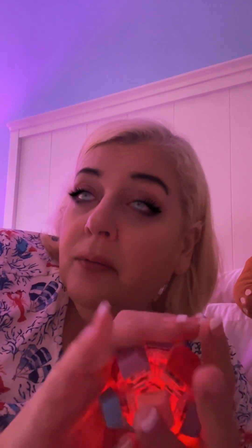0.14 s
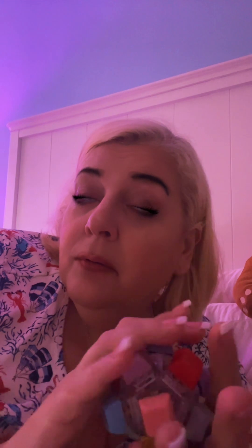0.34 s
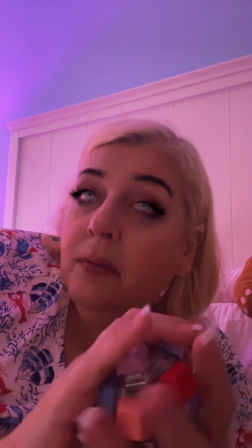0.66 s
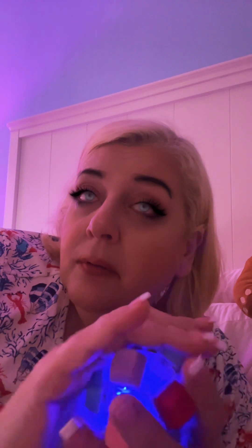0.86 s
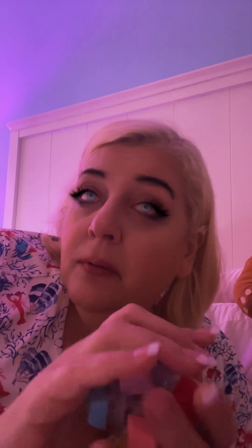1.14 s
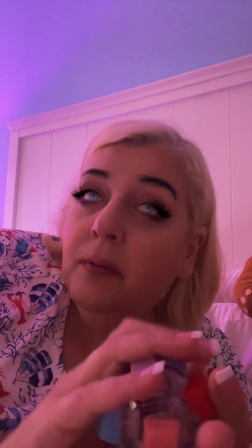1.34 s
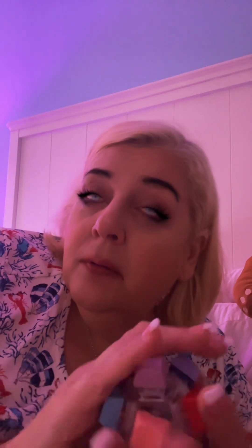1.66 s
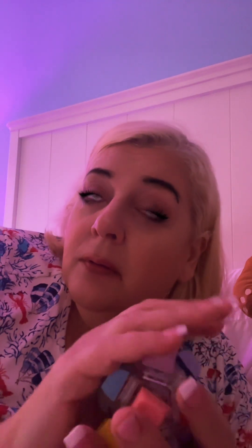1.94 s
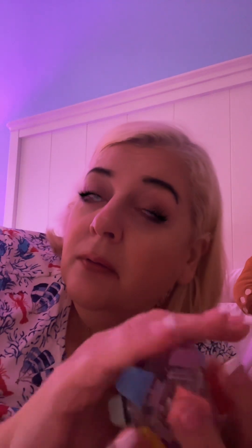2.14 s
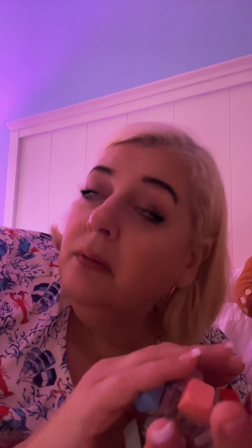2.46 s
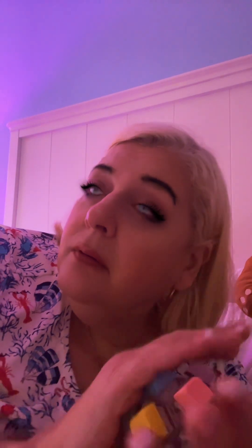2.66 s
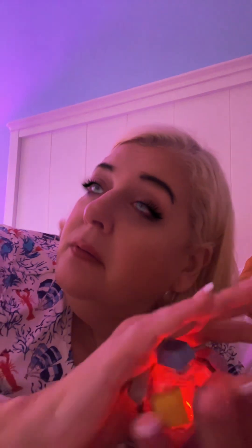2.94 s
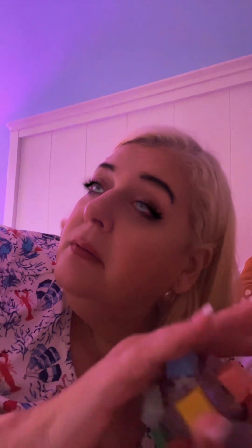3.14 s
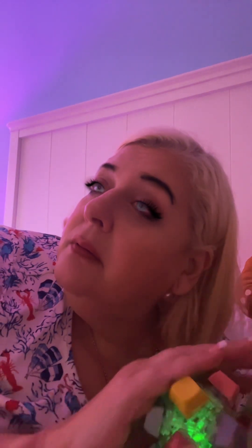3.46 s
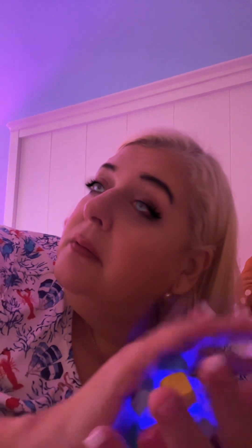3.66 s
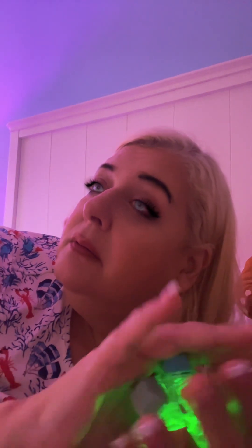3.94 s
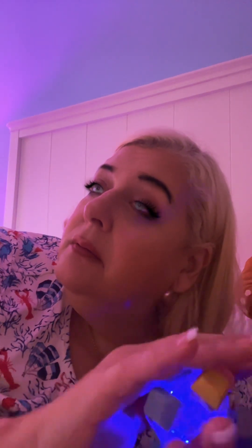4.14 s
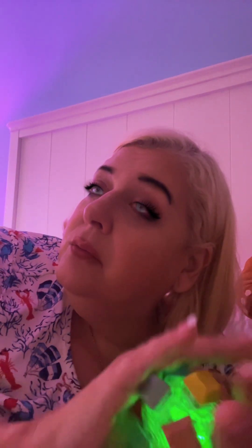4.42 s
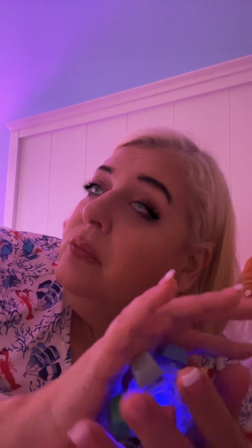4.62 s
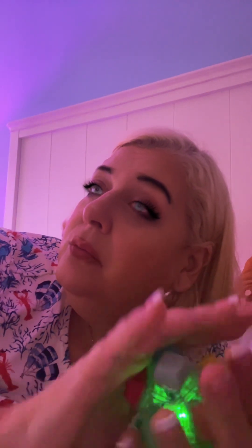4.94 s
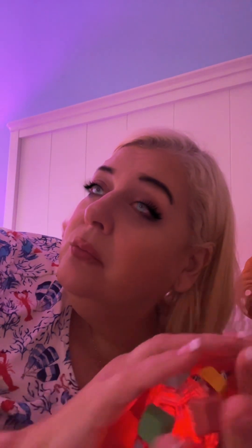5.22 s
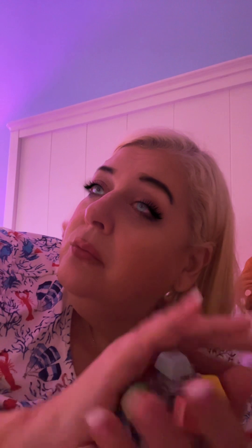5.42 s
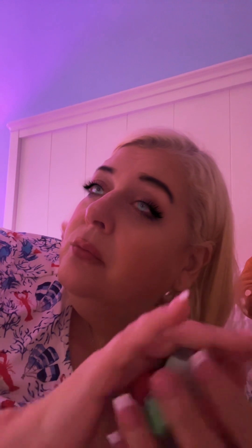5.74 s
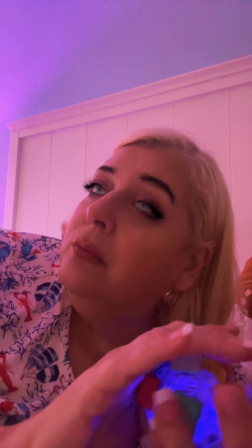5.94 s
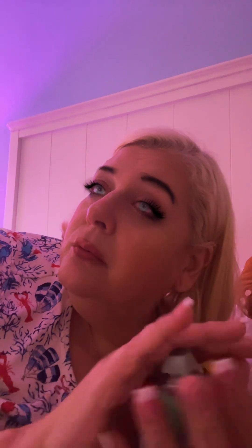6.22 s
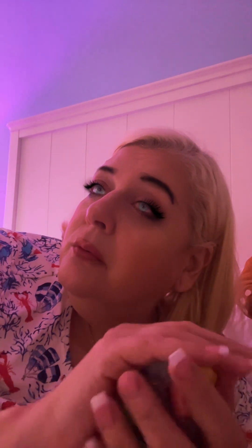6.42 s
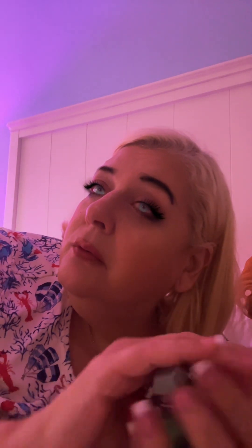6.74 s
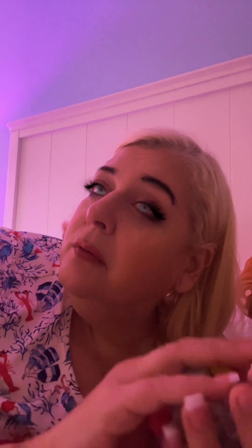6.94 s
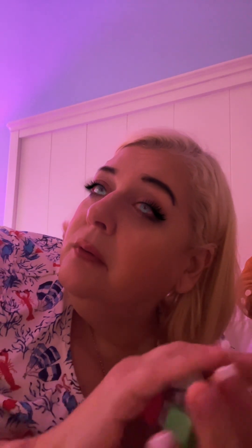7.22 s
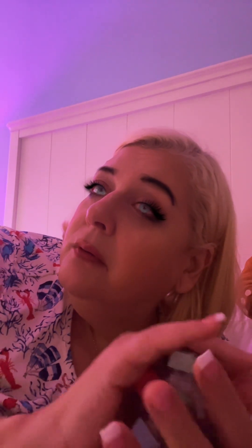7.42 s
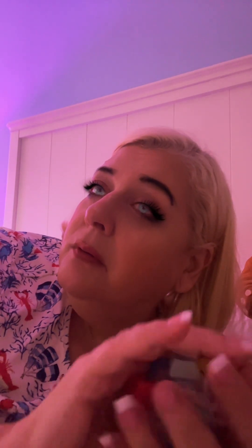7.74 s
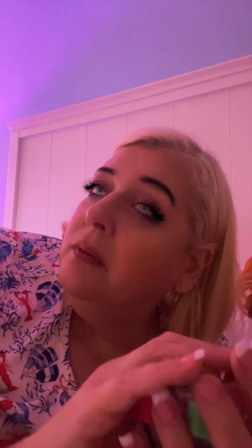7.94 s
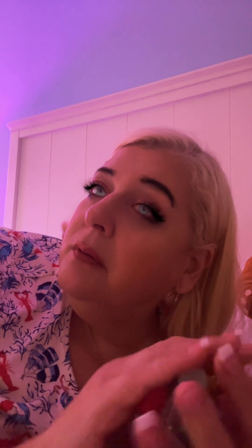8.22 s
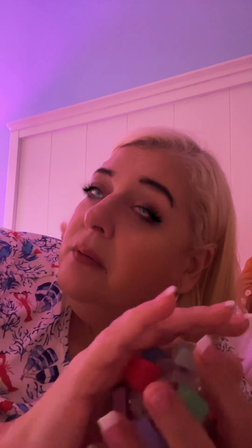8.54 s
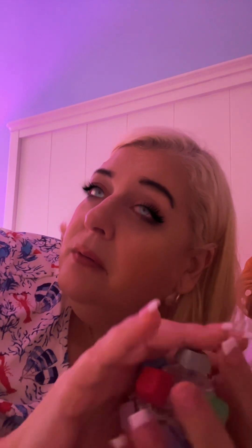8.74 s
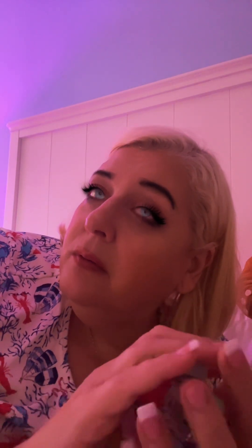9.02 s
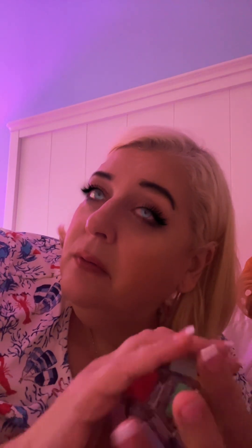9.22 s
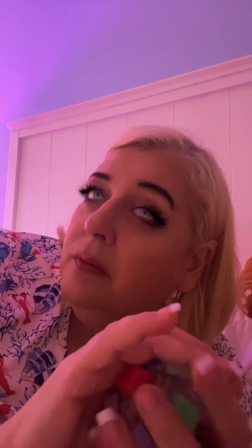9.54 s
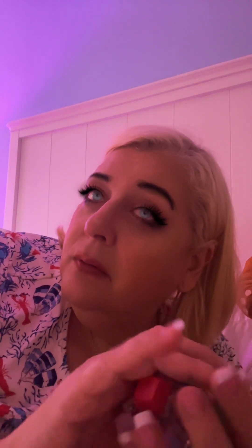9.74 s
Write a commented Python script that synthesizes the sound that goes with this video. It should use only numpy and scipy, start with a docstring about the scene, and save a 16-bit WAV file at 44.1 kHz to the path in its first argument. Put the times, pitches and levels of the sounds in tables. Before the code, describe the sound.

A handheld fidget ball covered in keyboard switches is worked continuously by two hands. Crisp, high, dry clicks stand out loudly over dull, hollow plastic clacks and a fine loose rattle, with rare tiny squeaks. The rhythm is irregular, with clusters and brief gaps. The sound is near and detailed in a small quiet room, with a soft low air rush, faint hum and barely audible thin whine.

```python
"""A quiet bedroom, where fingers roll a ball of plastic keycaps close to a phone.
Each switch snaps: a sharp blow makes its click leaf ring short and bright and shakes shell and cap.
Loose caps knock, bounce and rattle as ringing hollow bodies; now and then a stem squeaks, a rough tone.
The room answers with a short tail of fading noise, over a low ventilation rumble, hums and a thin whine."""
import sys
import numpy as np
from scipy import signal
from scipy.fft import rfft, irfft
from scipy.io import wavfile
from scipy.ndimage import uniform_filter1d

SR = 44100
rng = np.random.default_rng(int(sys.argv[2]) if len(sys.argv) > 2 else 0)


def linear_from_db(decibels):
    """Turn decibels (scalar or array-like) into linear amplitude factors; 0 gives 1."""
    return 10 ** (np.asarray(decibels, float) / 20)


def generate_wav(signal):
    """Clip the signal to [-1, 1] and save it as 16-bit WAV at the path in sys.argv[1]."""
    frames = np.transpose(np.atleast_2d(signal))
    scaled = np.clip(frames, -1, 1) * 32767
    pcm = np.round(scaled).astype(np.int16)
    wavfile.write(sys.argv[1], SR, pcm)


N = 435266

# lower ringing tones of a hollow cap: f/Hz, width/Hz, relative level/dB
CAP_LOW_TONES = [(1375, 358, -3), (1748, 260, 1), (2100, 350, -8)]
# upper ringing tones of a cap: f/Hz, width/Hz, relative level/dB
CAP_HIGH_TONES = [(2568, 210, -3.5), (2876, 148, 0)]


def unit(x):
    """Scaled to rms 1."""
    return x / np.sqrt(np.mean(x ** 2) + 1e-20)


def curve(rows):
    """One value per sample from rows of t/s, value."""
    return np.interp(np.arange(N) / SR, *np.transpose(rows))


def noise(gain):
    """Noise of rms 1 with a gain over frequency."""
    hz = np.fft.rfftfreq(N, 1 / SR) + 1  # the 1 keeps logarithms finite
    return unit(irfft(rfft(rng.standard_normal(N)) * gain(hz), N))


def modes(table, hz, scatter_db, detune, count):
    """Response of a body's ringing tones, a little different in level and pitch for each of count blows."""
    total = 0
    for k, (tone_hz, width_hz, db) in enumerate(table):
        draw = rng.standard_normal((count, 2))
        centre = tone_hz * (1 + detune * draw[:, :1])
        level = (-1) ** k * linear_from_db(db + scatter_db * draw[:, 1:])
        total = total + level * 1j * hz * width_hz / (centre ** 2 - hz ** 2 + 1j * hz * width_hz)
    return total


def contact(count, rise, fall, rough):
    """Spectra of short contact forces: a sharp blow amid micro-slips that swell and die (rise, fall in s)."""
    t = np.arange(1024) / SR
    swell = (1 - np.exp(-t / rise)) * np.exp(-t / fall)
    force = rough * swell * rng.standard_normal((count, len(t)))
    force[:, 12] += 1  # the sharp blow
    return rfft(force), np.fft.rfftfreq(len(t), 1 / SR)


def place(times, db, spectra):
    """Puts every blow at its time with its peak level."""
    waves = irfft(spectra)
    waves = waves * (linear_from_db(db) / np.abs(waves).max(1))[:, None]
    at = np.round(times * SR).astype(int)[:, None] + np.arange(waves.shape[1])
    return np.bincount(at.ravel(), waves.ravel(), N + SR)[:N]


def blows(times, db, force, ring):
    """Two rows: the blows as heard up close, and their more even, all-round radiation into the room."""
    near = force * ring
    # each ring is drawn halfway towards the average of all
    even = np.sqrt(np.abs(ring) * np.sqrt(np.mean(np.abs(ring) ** 2, axis=0)))
    radiated = even * np.exp(1j * np.angle(near))
    return np.array([place(times, db, near), place(times, db, radiated)])


def switch_blows(s, db, shell_db):
    """The click leaf rings briefly and shakes the switch shell and the cap."""
    # click leaf tones: f/Hz, width/Hz, relative level/dB
    leaf_tones = [(8672, 518, 8.5), (9270, 280, -5.5), (8050, 550, -11)]
    # switch shell tones: f/Hz, width/Hz, relative level/dB
    shell_tones = [(4070, 1100, -7.5), (5300, 380, 1), (7360, 620, 4), (7790, 410, 2.5)]
    # dry crack of the contact: f/Hz, width/Hz, relative level/dB
    crack_tones = [(10560, 930, -16.5), (13300, 5400, -19)]
    force, hz = contact(len(s), rise=0.00071, fall=0.0014, rough=0.29)
    leaf = modes(leaf_tones, hz, 1.5, 0.008, count=len(s))
    shell = linear_from_db(shell_db)[:, None] * modes(shell_tones, hz, 3, 0.045, count=len(s))
    # the crack grows less with force than the ring does, and goes with the shell
    crack_db = -0.6 * np.maximum(db, -28) + 0.23 * shell_db + 1.0
    crack = linear_from_db(crack_db)[:, None] * modes(crack_tones, hz, 2.2, 0.022, count=len(s))
    cap = linear_from_db(-4.5) * modes(CAP_LOW_TONES + CAP_HIGH_TONES, hz, 4.4, 0.064, count=len(s))
    # small parts radiate little bass
    cap = cap * (1j * hz / (1100 + 1j * hz)) ** 4
    ring = (leaf + shell + crack) * (1j * hz / (2500 + 1j * hz)) ** 2
    return blows(s, db, force, ring + cap)


def snaps():
    """Switches passing their click point."""
    # switch snaps: t/s, peak level/dB, level of the shell relative to the click leaf/dB
    snap_rows = [(0.068, -26.5, 0.5), (0.1979, -25.5, 5.5), (0.231, -7, -2.5), (0.2965, -9, 1),
                 (0.5726, -8, -6.5), (0.803, -3.5, -28.5), (0.824, -11, -7), (1.1017, -1.5, -16),
                 (1.165, -12.5, 4.5), (1.2845, -6.5, -4.5), (1.6884, -5, -9.5), (1.8508, -6.5, -1.5),
                 (1.873, -11.5, 4.5), (2.041, -9, -4.5), (2.4416, -3.5, -16), (2.5307, -3, -7),
                 (2.5546, -10, -0.5), (2.701, -5, -38), (2.8007, -7.5, -33.5), (2.9286, -7.5, -20.5),
                 (3.019, -7.5, -10.5), (3.0696, -12, 1), (3.294, -2, -15), (3.305, -11, 2.5),
                 (3.3508, -12.5, 4), (3.3777, -7, -19.5), (3.6585, -2, -17), (3.8583, -3, -5.5),
                 (3.8676, -11, -4.5), (4.1024, -2.5, -13), (4.1243, -5.5, -2), (4.1514, -5.5, -21.5),
                 (4.161, -12, 10.5), (4.5888, -4.5, -9), (4.604, -9, -7.5), (4.9, -10.5, 2),
                 (4.962, -5.5, -3), (5.111, -4, -26.5), (5.7174, -0.5, -24.5), (5.761, -7, -11),
                 (5.8044, -4.5, -23.5), (5.8376, -10, -1.5), (6.0407, -10.5, 2.5), (6.117, -4.5, -17.5),
                 (6.3352, -28, 8), (6.4706, -10.5, 1.5), (6.5536, -6, -12), (6.5925, -8, -2),
                 (6.7224, -7, -28), (6.7446, -3.5, -15.5), (6.798, -4.5, -11.5), (6.9505, -3, -46),
                 (7.1684, -3, -37), (7.3195, -6.5, -8), (7.37, -10.5, -2.5), (7.3824, -7.5, -14.5),
                 (7.5783, -31, 8.5), (7.684, -4, -14), (7.9414, -10, 5), (7.9476, -3, -30.5),
                 (8.0225, -12, 4), (8.056, -5, -25), (8.0922, -9, -6), (8.2523, -7.5, -7.5), (8.43, -13, 0),
                 (8.8348, -4.5, -6.5), (8.9332, -7.5, 5), (9.0274, -3, -10), (9.091, -10, 3),
                 (9.1371, -10, -3), (9.1471, -8.5, -4.5), (9.5706, -5, -2.5), (9.6752, -3.5, -40),
                 (9.8065, -6, -23.5), (9.8277, -3.5, -3)]
    return switch_blows(*np.transpose(snap_rows))


def knock_rows():
    """Time, level, upper tones and pitch (0 = any cap) of every knock."""
    # keycap knocks: t/s, peak level/dB, level of the cap's upper tones relative to the lower/dB,
    # and for clear knocks the pitch of that cap, f/Hz
    knock_list = [(0.014, -26, -8), (0.02, -21.5, -10, 1500), (0.1315, -15.5, -6.5, 1710),
                  (0.257, -18.5, -4.5, 1850), (0.3307, -24.5, -8), (0.386, -30, -18),
                  (0.397, -34, -20, 1350), (0.4306, -31, -20), (0.461, -33, -6, 1550),
                  (0.5924, -19.5, -11, 1850), (0.6512, -9.5, -12, 1860), (0.85, -18.5, -14, 1650),
                  (0.8941, -20, -6), (0.8994, -20.5, -4), (1.065, -18, -1.5, 1660),
                  (1.1253, -18.5, -11, 1600), (1.1497, -16, -5, 1730), (1.3177, -18.5, -1.5),
                  (1.4378, -16, -6, 1650), (1.474, -31, -15, 1500), (1.492, -32, -15),
                  (1.555, -32, -20, 1300), (1.6876, -16, 5), (1.713, -23.5, -13), (1.77, -16, -16, 1730),
                  (2.1407, -22, -17), (2.2123, -24.5, -16), (2.221, -27, -5), (2.236, -23, 0),
                  (2.3558, -21, -4.5), (2.428, -23, 0), (2.4777, -20, -9.5), (2.5562, -20.5, -2.5),
                  (2.572, -28, -9), (2.6, -26.5, -15), (2.628, -21, -9), (2.6546, -20.5, -12.5),
                  (2.6625, -23, 6), (2.6782, -20, -4.5), (2.693, -27, -5), (2.723, -22.5, -18),
                  (2.7464, -16.5, -4.5), (2.758, -21, 6.5), (2.769, -19, -7, 1690), (2.781, -26, -4),
                  (2.8153, -17, -12, 1520), (2.9567, -28, -18), (2.995, -25.5, -18.5), (3.052, -21.5, -8.5),
                  (3.066, -17, -6, 1750), (3.096, -28, -3), (3.136, -21, -2), (3.159, -19, -4, 1850),
                  (3.1774, -19.5, 5), (3.194, -28, -3), (3.2137, -20, 1), (3.2228, -22, -2),
                  (3.246, -27, -4), (3.372, -16, 1.5, 1790), (3.4027, -23.5, -8.5), (3.456, -30, -15),
                  (3.479, -30, -10), (3.5805, -19.5, -30, 1750), (3.7032, -22.5, -24), (3.903, -23.5, -8.5),
                  (4.0039, -21, -11), (4.0214, -21.5, -12), (4.1329, -23, -8), (4.1931, -18, -10, 1550),
                  (4.2024, -23.5, -8), (4.2272, -19.5, -5.5), (4.258, -24.5, -17.5), (4.4217, -22, -26.5),
                  (4.4396, -11, -10, 1660), (4.452, -20, -31), (4.4678, -21.5, -1), (4.48, -28, -15, 1500),
                  (4.5726, -13, -8.5, 1700), (4.585, -24, -10), (4.6232, -24.5, -9), (4.646, -28, -10),
                  (4.706, -20, -14), (4.7613, -25.5, -29), (4.9, -22, -3), (4.951, -19, -8, 1720),
                  (4.9889, -24.5, -14), (5.1321, -19.5, -1.5), (5.2156, -13, -19, 1830),
                  (5.2938, -24, -7.5), (5.3776, -27, -18), (5.401, -23, -7), (5.4492, -25, -23),
                  (5.5406, -28, -27), (5.7607, -19.5, 1.5), (5.9934, -25.5, -9), (6.03, -24.5, 1),
                  (6.0989, -24.5, -16), (6.2046, -10.5, -12, 1760), (6.355, -25.5, -21),
                  (6.3747, -21.5, -6), (6.45, -21.5, 3), (6.7455, -17, 13.5), (6.7926, -17.5, -7, 1600),
                  (6.975, -20.5, -13), (7.138, -22, -16), (7.1813, -24.5, -8.5), (7.2949, -22.5, -15),
                  (7.386, -24.5, -12), (7.428, -27.5, -11), (7.4934, -25, -23), (7.751, -30, -25),
                  (7.821, -27, -11), (7.8751, -22.5, -9), (7.983, -21, -8), (8.059, -18.5, 6),
                  (8.1262, -23.5, -7), (8.247, -16, -6, 1660), (8.3681, -13.5, -14, 1810),
                  (8.392, -14, -13, 1700), (8.4666, -14, -2, 1560), (8.544, -18, -20, 1640),
                  (8.6706, -21.5, -19), (8.909, -26.5, -7), (8.9866, -24.5, -4.5), (9.1216, -17.5, 5.5),
                  (9.138, -19.5, 12.5), (9.24, -17.5, -18, 1710), (9.2635, -19, -15, 1760),
                  (9.285, -26.5, -4), (9.473, -29.5, -11.5), (9.531, -30, -5), (9.571, -14.5, 12),
                  (9.607, -27, -8), (9.7547, -31.5, 3)]
    return np.transpose([(*row, 0)[:4] for row in knock_list])


def cap_blows(s, db, high_db, pitch_hz):
    """A soft contact rings the hollow cap, whose air makes the ring swell; so small a body radiates no bass."""
    # faint broad tones of the cap's rim: f/Hz, width/Hz, relative level/dB
    rim_tones = [(4160, 1000, -27), (7800, 8300, -35)]
    force, hz = contact(len(s), rise=0.00094, fall=0.0014, rough=0.22)
    any_cap_hz = 1720 * (1 + 0.06 * rng.standard_normal(len(s)))  # usual pitch, spread from cap to cap
    pitch_hz = np.where(pitch_hz > 0, pitch_hz, any_cap_hz)
    # the middle low tone lands on the pitch, the other low ones move along
    scaled = hz * CAP_LOW_TONES[1][0] / pitch_hz[:, None]
    ring = modes(CAP_LOW_TONES, scaled, 3, 0.02, count=len(s))
    ring = ring * modes([(1800, 3000, 0)], scaled, 0, 0, count=len(s))  # the air inside
    ring = ring + linear_from_db(high_db)[:, None] * modes(CAP_HIGH_TONES, hz, 3.35, 0.025, count=len(s))
    ring = ring + modes(rim_tones, hz, 4, 0.08, count=len(s))
    no_bass = (1j * hz / (1050 + 1j * hz)) ** 4
    soft = 1 / (1 + 1j * hz / 6000)
    return blows(s, db, force, ring * no_bass * soft)


def knocks():
    """Caps graze, hit their stops and each other: a light touch just before, two weaker bounces after."""
    s, db, high_db, pitch_hz = knock_rows()
    draw = rng.random((len(s), 3, 2))
    apart = -0.006 * np.log(draw[..., 0] + 0.01) + 0.0022  # s
    bounce_db = db[:, None] - 8 - 9 * draw[..., 1] - 400 * apart
    at = np.maximum(s[:, None] + apart * [-0.5, 1, 2], 0)
    bounce_high_db = np.repeat(high_db, 3) * 0.74
    bounces = cap_blows(at.ravel(), bounce_db.ravel(), bounce_high_db, np.repeat(pitch_hz, 3))
    return cap_blows(s, db, high_db, pitch_hz) + bounces


def rattle():
    """Many faint cap contacts in loose clumps, denser and larger while the fingers are busy."""
    # how busily the fingers roll the ball (only the changes count): t/s, level/dB
    rolling = [(0.0, -52), (0.16, -51), (2.23, -53), (2.47, -50), (2.61, -43), (2.8, -48), (3.21, -42),
               (3.57, -53), (4.48, -51), (6.13, -52), (7.92, -52), (9.87, -53)]
    draw = rng.random((900, 4))
    busy_db = curve(rolling) - curve(rolling).mean()
    # busy moments get a larger share of the clumps, of six contacts each
    share = np.cumsum(linear_from_db(1.2 * busy_db))
    clump = np.repeat(np.interp(draw[::6, 0], share / share[-1], np.arange(N) / SR), 6)
    s = np.clip(clump + 0.076 * draw[:, 3], 0, (N - 1) / SR)
    # many small contacts, few large ones
    db = -45 + 0.47 * busy_db[(s * SR).astype(int)] - 4.5 * np.log(draw[:, 1] + 0.026)
    return cap_blows(s, db, -14 + 16 * draw[:, 2], 0 * s)


def ticks():
    """Switch parts take up their play: at every knock, and faintly at any time."""
    s, db, *_ = knock_rows()
    draw = rng.random((len(s) + 120, 3))
    # about 23 dB under its knock, up to 10 dB either way
    db = db - 23 + 10 * 2 * (draw[:len(s), 1] - 0.5)
    db = np.append(db, -49.5 - 5.4 * np.log(draw[len(s):, 1] + 0.02))
    s = np.append(s, draw[len(s):, 0] * N / SR)
    return switch_blows(s, db, -3 + 12 * draw[:, 2])


def squeaks():
    """Plastic stems squeak as they slide: each a short tone, rough in level and pitch."""
    # squeaks: t/s, length/s, f/Hz, level before the stutter/dB
    squeak_rows = [(0.1, 0.027, 4300, -46), (5.584, 0.024, 6270, -50.5), (6.23, 0.016, 4390, -39),
                   (8.816, 0.048, 1293, -45), (9.427, 0.026, 4220, -45)]
    out = np.zeros(N)
    for s, length, hz, db in squeak_rows:
        t = np.arange(round(length * SR)) / SR
        stutter = linear_from_db(60 * uniform_filter1d(rng.standard_normal(len(t)), size=150))
        slip = hz / 40000 * np.cumsum(rng.standard_normal(len(t)))  # wandering phase
        swell = np.sin(np.pi * t / length) ** 0.5
        tone = np.sin(2 * np.pi * hz * t + slip)
        out[round(s * SR):][:len(t)] = linear_from_db(db) * stutter * swell * tone
    return out


def room(x):
    """The tail builds up after the first walls answer; moving hands change it from moment to moment."""
    # room tail: f/Hz, time to fade by 60 dB/s, relative level/dB
    tail_rows = [(990, 0.14, -16.5), (2780, 0.16, -14.5), (5670, 0.29, -12.5), (9550, 0.31, -22.5),
                 (14000, 0.14, -14.5)]
    f, t60, db = np.transpose(tail_rows)
    step, wet = 8192, np.zeros(N + SR)  # a new tail every step samples
    hz, t, z = signal.stft(rng.standard_normal((N // step + 1, SR // 2)), SR, nperseg=256)
    at = np.log(hz + 1)
    start_db = np.interp(at, np.log(f), db)[:, None]
    fade = linear_from_db(start_db - 60 * t / np.interp(at, np.log(f), t60)[:, None])
    # cupped hands colour every tail differently
    tint = unit(uniform_filter1d(rng.standard_normal(z.shape[:2]), size=5, axis=1))
    fade = fade * linear_from_db(2 * tint)[..., None]
    tails = signal.istft(z * fade, SR, nperseg=256)[1]
    age = np.arange(tails.shape[1]) / SR
    tails = tails * (1.3 - np.exp(-(age / 0.028) ** 3)) * linear_from_db(-24.0)
    # single walls and furniture make the tail lumpy
    tails = tails * linear_from_db(49 * uniform_filter1d(rng.standard_normal(tails.shape), size=120))
    for k, tail in enumerate(tails):
        part = signal.fftconvolve(x[k * step:][:step], tail)
        wet[k * step:][:len(part)] += part
    return wet[:N]


def ventilation():
    """Rush of air: steady noise, strongest in the lows."""
    # colour of the rush: f/Hz, relative level/dB
    air_rows = [(15, -55), (25, -22), (59, 3), (217, 3), (863, -12.5), (1700, -8), (2220, -6), (2840, -7),
                (3620, -13), (8830, -22.5), (16000, -31.5)]
    f, db = np.transpose(air_rows)
    return linear_from_db(-51) * noise(lambda hz: linear_from_db(np.interp(np.log(hz), np.log(f), db)))


def hum():
    """Narrow bands of noise, heard as unsteady hum."""
    # hum: f/Hz, width/Hz, level/dB
    hum_rows = [(234, 45, -63)]
    return sum(linear_from_db(db) * noise(lambda hz: 1 / (1 + ((hz - c) / w * 2) ** 2)) for c, w, db in hum_rows)


def drone():
    """A low hum, a narrow band of noise near 73 Hz that swells for a while."""
    # swell of the drone: t/s, level/dB
    drone_rows = [(0, -88), (5.6, -60.5), (6.1, -51), (6.6, -65), (7.6, -57), (9.87, -61.5)]
    return linear_from_db(curve(drone_rows)) * noise(lambda hz: 1 / (1 + ((hz - 73) / 6.4) ** 2))


def whine():
    """A distant motor's thin pure tone, drifting slightly up, then down."""
    # pitch of the whine: t/s, f/Hz
    whine_rows = [(0, 510), (2.2, 513.5), (9.87, 498)]
    return linear_from_db(-66.5) * np.sin(2 * np.pi * np.cumsum(curve(whine_rows)) / SR)


def scene():
    """Toy, room and room tone at one microphone."""
    near, radiated = snaps() + knocks() + rattle() + ticks() + squeaks()
    room_tone = ventilation() + hum() + drone() + whine()
    return (near + room(radiated) + room_tone)[None]


def top_cut(x):
    """Nothing passes above the cut-off."""
    return signal.sosfilt(signal.butter(12, 16960, fs=SR, output="sos"), x)


def record(dry):
    """The phone's microphone port dulls the top."""
    # microphone port: f/Hz, level/dB
    port_rows = [(9520, 0), (9700, -8), (15750, -3), (15900, -16.5), (16500, -35.5), (16900, -58.5)]
    port = linear_from_db(np.interp(np.fft.rfftfreq(N, 1 / SR), *np.transpose(port_rows)))
    return top_cut(irfft(rfft(dry) * port, N))


dry = scene()
out = record(dry)
generate_wav(out)
```